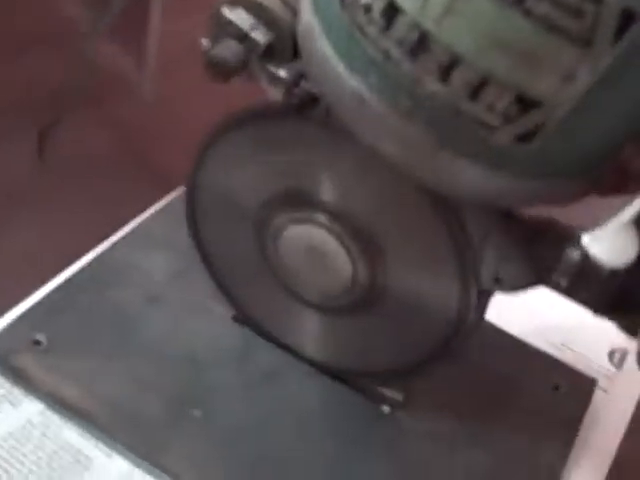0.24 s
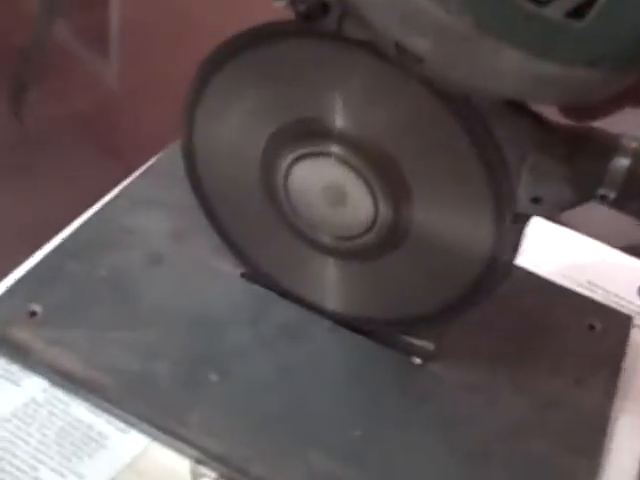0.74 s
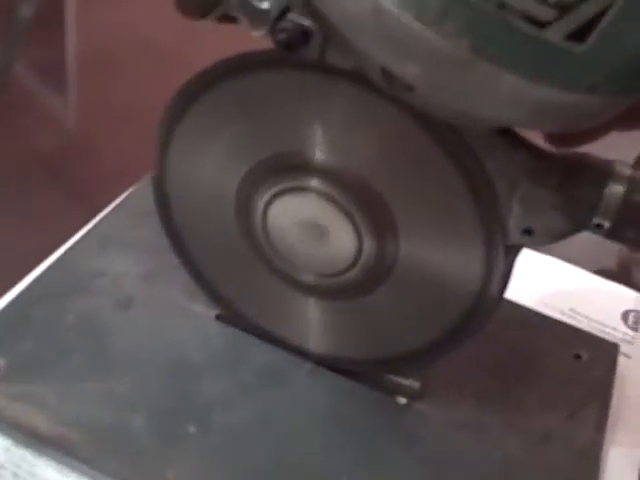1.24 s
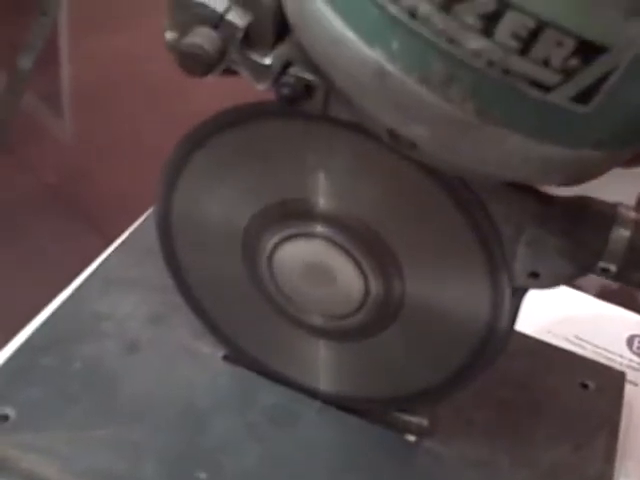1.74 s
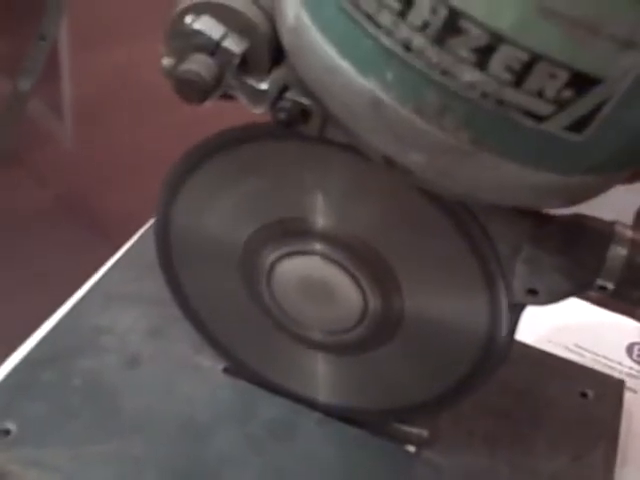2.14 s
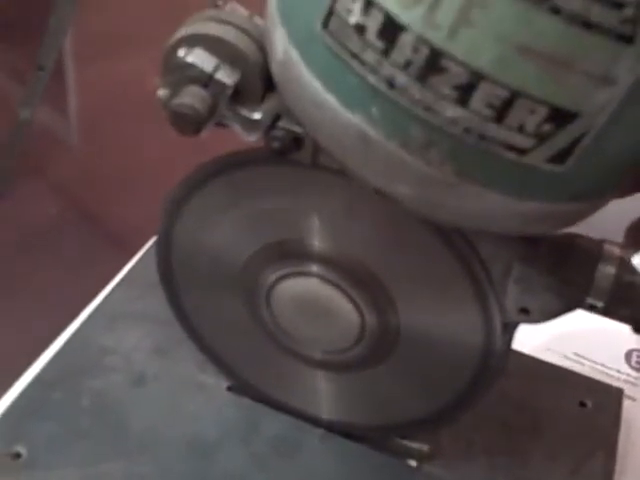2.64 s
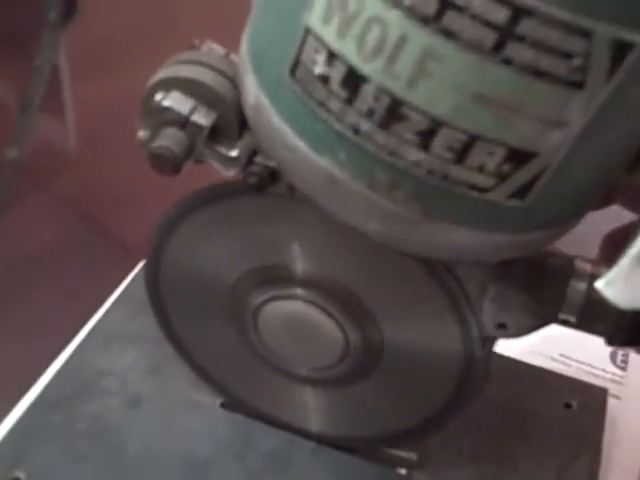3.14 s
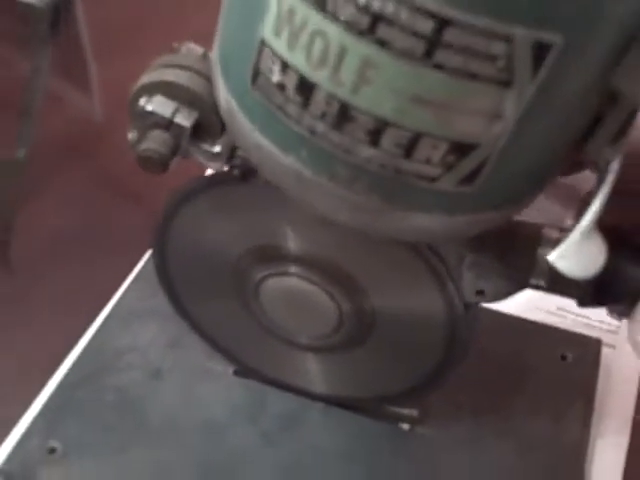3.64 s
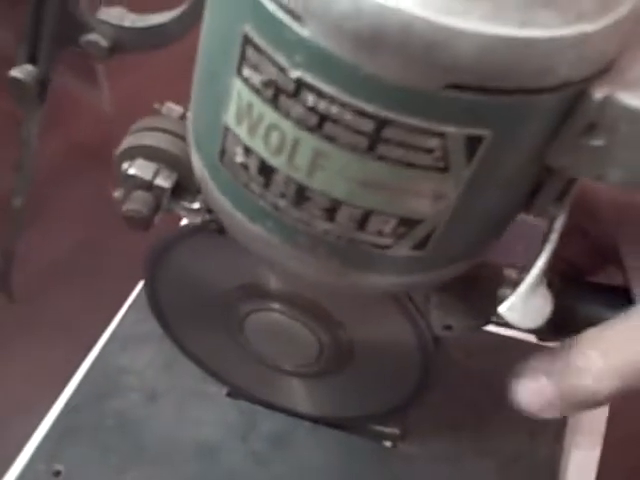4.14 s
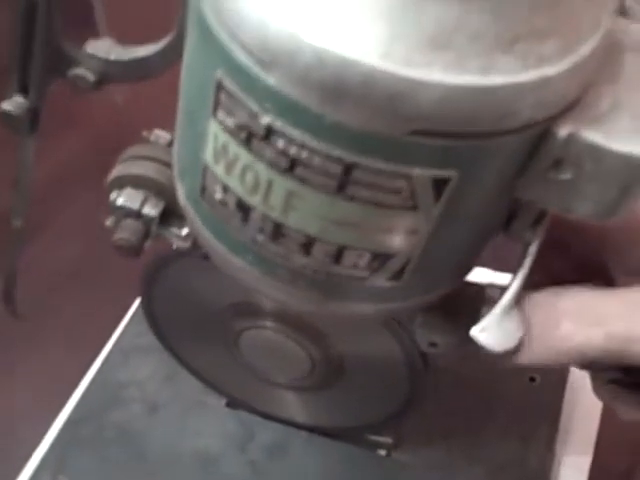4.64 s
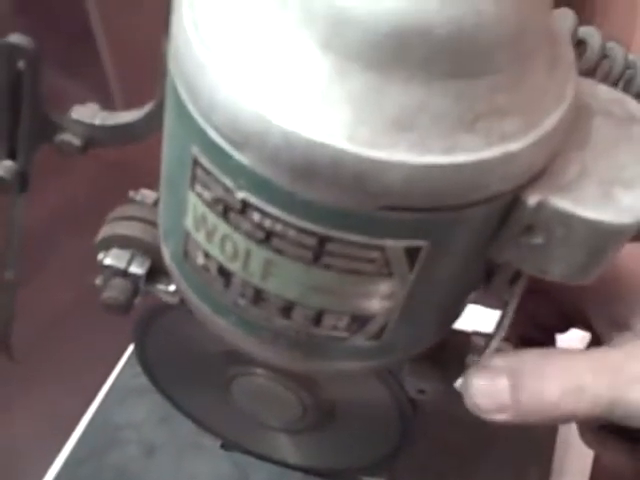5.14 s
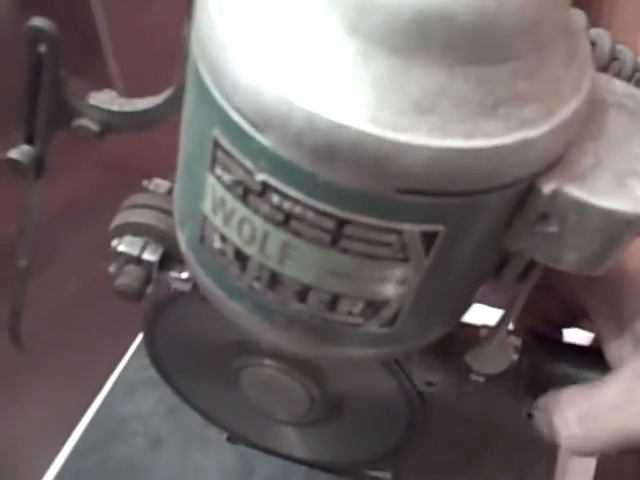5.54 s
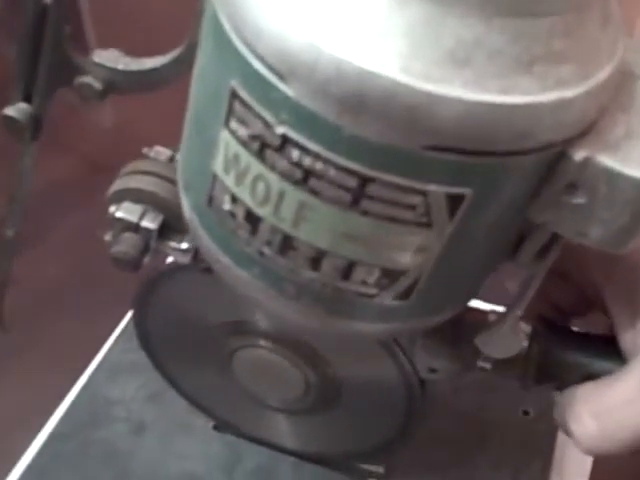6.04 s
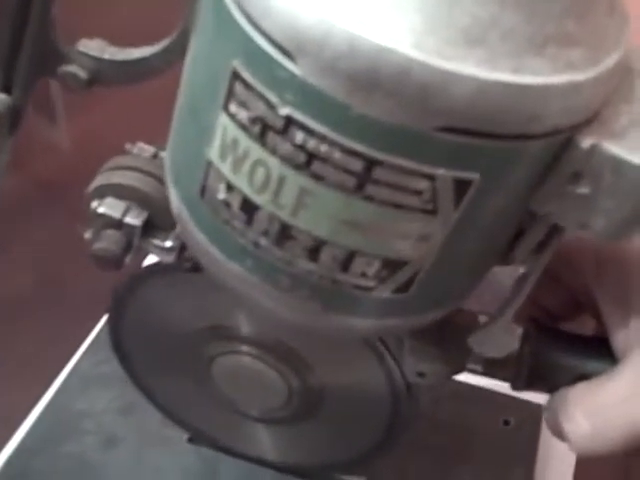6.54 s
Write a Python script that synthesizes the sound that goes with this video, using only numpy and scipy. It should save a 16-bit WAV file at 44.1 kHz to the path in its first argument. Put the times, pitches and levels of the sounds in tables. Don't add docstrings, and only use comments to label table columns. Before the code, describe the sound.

An electric cutter is already running at full speed, heard very close in a room with a faint low background hum. A buzzing geared drone holds steady, with a clear tone near 715 Hz, a stack of metallic whines above it and a broad airy hiss from the vents. High ringing tones from the blade flare and sink. Tiny bright steel ticks gather into a rattle around 0.6-1.3 s, again around 1.9-2.7 s, then more sparsely near 3.6-4 s and 5-5.4 s. As the microphone swings from blade to motor by about 5.2 s, the clear tone grows stronger and the grinding slightly softer. At 5.45 s a hard, bright switch snap bounces briefly. The pitch slides down, tones becoming ragged, surging and fading, hiss dwindling. From 6.54 s a dry, pulsing scrape with small catches rubs until the end at about 6.8 s, the rotor still turning.

```python
import sys
import numpy as np
from scipy import signal
from scipy.fft import rfft, irfft, next_fast_len
from scipy.io import wavfile
from scipy.ndimage import uniform_filter1d, map_coordinates

SR = 44100
rng = np.random.default_rng(int(sys.argv[2]) if len(sys.argv) > 2 else 0)


def bounce(signal):
    frames = np.transpose(np.atleast_2d(signal))
    limited = np.clip(frames, -1, 1)
    pcm = np.round(limited * 32767).astype(np.int16)
    wavfile.write(sys.argv[1], SR, pcm)


def gain_from_decibels(decibels):
    exponent = np.asarray(decibels, float) / 20
    return 10 ** exponent


N = 299870
T = np.arange(N) / SR

SHAFT_HZ, BLADE_HZ, BEAT_HZ = 59.652, 18.17, .685
BEAT_TOP_S = 0.937
OFF_S, BRAKE_PER_S, EASE_PER_S2 = 5.45, .51, .06
# t/s, share
VIEW = [(0, 0.62), (.4, 0.33), (1.0, 0.02), (1.8, 0.13), (2.8, 0.29), (3.5, 0.35), (3.68, 0.34),
        (3.84, 0.66), (4.3, 0.78), (4.6, .85), (5.19, 1), (5.45, 0.99), (5.7, 0.79), (6.8, 0.9)]
GEARS_LAW, CASING_LAW, AIR_LAW = (-29, -2.52, 0.76), (-27.5, -3, 1.723), (-35, -0.47, 1.81)

# f/Hz, level/dB per Hz
ROOM_TONE = [(13, -48), (22, -20.5), (54, -1.5), (97, -14), (306, -11.5), (367, -29.5), (400, -17.5),
             (520, -43.5), (880, -120)]
BUMP_S, BUMP_DB, BUMP_LASTS_S = 5.85, 6, .15

# shaft order, level/dB one blade turn below, on the order, one above, two above
GEARS = [(3, -53.8, -45.0, -44.3, -44.7), (4, -46.0, -45.4, -34.9, -37.3), (5, -43.2, -44.7, -40.6, -45.0),
         (6, -46.5, -40.8, -49.1, -51.0), (7, -53.1, -46.5, -56.3, -50.4), (8, -52.3, -44.3, -53.0, -51.9),
         (9, -90.0, -50.4, -51.0, -50.0), (10, -50.6, -41.7, -45.3, -46.3),
         (11, -49.4, -38.8, -53.0, -55.3), (12, -90.0, -26.0, -71.8, -75.0),
         (13, -54.7, -58.6, -56.2, -90.0), (14, -57.4, -48.5, -63.1, -67.8),
         (15, -69.9, -53.3, -60.0, -69.1), (16, -67.8, -57.6, -59.3, -66.0),
         (17, -48.8, -39.0, -49.2, -57.9), (18, -49.1, -45.3, -43.5, -54.0),
         (19, -48.9, -43.1, -48.4, -79.5), (20, -54.3, -50.1, -55.5, -63.0),
         (21, -56.9, -46.9, -54.8, -59.9), (22, -64.2, -53.2, -60.7, -59.1),
         (23, -56.7, -51.3, -56.6, -60.6), (24, -54.4, -53.6, -62.6, -57.2),
         (25, -64.3, -48.2, -62.4, -90.0), (26, -65.2, -55.7, -65.5, -70.0)]
SWELL_DB, SWELL_LOW_DB, SWELL_LAG = 1.9, 2.5, 0.125
PINION, PINION_SWELL_DB, PINION_LAG, PINION_VIEW_DB = 17, 3, -.15, -4
LOW_VIEW_DB, MID_VIEW_DB = 2.5, -2
# t/s, level/dB
SURGES = [
    (5.71, 5),
    (5.83, 3),
    (5.97, 4),
    (6.15, 4),
    (6.24, 3),
    (6.37, 3),
    (6.51, 4),
]
SURGE_S = .035
# multiple of shaft speed, level/dB
BEARINGS = [(12.838, -51), (20.269, -49.5), (32.162, -56.5), (34.001, -46.5), (34.768, -49),
            (35.695, -49.5), (35.999, -49), (36.304, -53), (36.998, -50.5), (37.523, -48), (39.0, -49),
            (39.86, -53), (42.884, -46.5), (42.999, -46), (44.335, -51), (47.244, -54.5), (47.839, -45.5),
            (48.647, -47.5), (51.945, -51.5), (52.605, -53), (54.999, -46.5), (59.99, -51.0), (63.327, -52),
            (65.834, -52), (79.447, -56)]
# multiple of shaft speed, level/dB
TEETH = [(10.325, -45.5), (10.719, -51), (10.92, -51.5), (24.448, -52), (35.303, -57), (36.521, -66),
         (36.693, -57), (41.885, -60), (47.001, -54.5), (49.243, -58), (53.194, -60.5), (54.601, -44),
         (55.379, -48.5), (55.608, -49), (55.771, -48), (56.014, -53.5), (57.966, -56), (58.561, -49),
         (58.967, -55), (59.37, -63), (65.326, -73), (65.837, -69.5), (81.407, -50), (82.191, -54.5),
         (104.868, -54)]
# multiple of shaft speed, level/dB
TEETH_LOW = [(3.654, -50.5), (4.655, -41), (5.324, -42.5)]
# multiple of shaft speed, level/dB
FAINT = [(8.93, -46), (20.53, -56), (33.3, -56), (33.71, -55), (34.29, -55), (37.99, -55), (40.88, -54),
         (41.65, -56), (44.72, -56), (45.08, -55), (46.43, -53), (48.24, -47), (49.91, -55), (51.21, -52),
         (51.62, -53), (56.72, -54), (56.99, -56), (59.38, -55), (70.08, -60), (72.6, -60), (73.46, -59),
         (76.03, -55), (77.75, -58), (80.45, -56), (82.21, -54), (82.89, -57), (84.74, -60), (85.64, -60),
         (86.36, -61), (86.77, -60), (89.07, -61), (90.74, -60), (92.73, -61), (95.21, -61), (120.21, -60)]
FAINT_DB = 3
# multiples of shaft speed; dB facing the blade, change at the motor
SHADED, SHADE_DB = (42.884, 42.999), (4, -15)
# f/Hz, width/Hz, level/dB
BODY = [(195.2, 67, -6.5), (265, 37, -0.5), (313.3, 20.5, 3.5), (436, 91, -24), (644.5, 152.2, -0.5),
        (834, 30.5, -9), (1072, 100, -10), (1347, 194, -10.5), (1720, 200, -31.5), (2043, 560, -14),
        (2568, 112, -12), (2932, 127, -7.5), (3290, 320, -9.5), (3750, 270, -34.5), (4720, 380, -20.5),
        (5786, 310, -18.5)]
HOOD, HOOD_SHARE = (3050, 700, 0), .45
# f/Hz, width/Hz, grinding level/dB in the drive
DISC_MODES = [(2150, 140, -9), (3185, 130, -10), (4725, 240, -6)]
# t/s, peak level/dB, t/s to lose 10 dB
FLARES = [
    [(.44, -39, 0.21), (1.3, -31.5, .25), (1.75, -31.5, .35), (2.3, -40, 0.34), (2.7, -35, 0.27),
     (3.38, -34.5, 0.26), (4.09, -45.5, 0.2), (5.4, -51.5, 0.24), (6.55, -46, 0.07)],
    [(.1, -28.5, .35), (.95, -37, .3), (2.27, -41, 0.07), (2.92, -30.5, 0.18), (3.7, -37, 0.16),
     (4.1, -26.5, .28), (4.6, -36.5, 0.2), (5.06, -34.5, 0.31), (5.7, -34, .3), (6.29, -41.5, 0.17),
     (6.8, -38, 0.1)],
    [(.5, -32.5, .1), (1.5, -45, 0.15), (2.27, -41, 0.09), (2.95, -33, .25), (3.42, -29.5, .3),
     (3.82, -31, .28), (4.53, -35, 0.39), (5.06, -33.5, .45), (5.5, -36, 0.25), (5.72, -38, .3),
     (5.95, -40, .3), (6.29, -45, 0.32)],
]
REST_DB = [-56, -56.5, -58.5]
# f/Hz, level/dB per Hz
AIR = [(1500, -16), (2500, -3), (3880, -7), (4020, -11), (4600, -11), (5400, -8.5), (6600, -14.5),
       (7600, -15.5), (8300, -16), (9300, -14), (10200, -11.5), (11500, -16), (13300, -15.5), (14100, -18),
       (15200, -22.5), (15800, -14)]
# f/Hz, width/Hz, level/dB over the air
VENTS = [(6225, 50, 3), (7075, 130, 8.5), (7688, 230, 6.5), (11530, 194, 2), (12900, 300, 1.5),
         (15300, 400, -3.5)]
START_DB, START_S = 3, .1
MESH_DB, MESH_VIEW_DB = -28.5, 7

SINGERS = [53.326, 78.735, 79.466]
# t/s, peak level/dB
SONGS = [
    [(.2, -34), (.45, -37), (.85, -36), (1.3, -40), (1.7, -40), (2.2, -39), (2.95, -35), (3.5, -37),
     (4.1, -30), (4.45, -35), (4.75, -38), (5.1, -42)],
    [(.1, -46), (.95, -44), (1.55, -42), (1.8, -43), (2.1, -46), (2.6, -49), (3.13, -39), (3.5, -37),
     (3.95, -39), (4.4, -38), (4.65, -41), (5.1, -39)],
    [(.5, -40), (.75, -45), (1.2, -49), (2.2, -48), (2.6, -46), (2.95, -37), (3.3, -36), (3.45, -34),
     (3.75, -36), (4.2, -44), (4.5, -41), (4.75, -40), (5.2, -47)],
]
SONG_FADE_DB_PER_S = 55

# t/s, peak level/dB, brightness/dB
TICKS_FIRST = [(0.0962, -33, -15), (0.1006, -35, -10), (0.1083, -35, -14), (0.1124, -36, -13),
               (0.1178, -36, -14), (0.429, -29, -9), (0.529, -35, -14), (0.5409, -30, -18),
               (0.5454, -33, -12), (0.5958, -32, -13), (0.6072, -32, -15), (0.6462, -35, -15),
               (0.6574, -24, -18), (0.6732, -30, -19), (0.7078, -29, -17), (0.7236, -29, -19),
               (0.7579, -29, -20), (0.7636, -28, -20), (0.8077, -26, -14), (0.8136, -26, -12),
               (0.8198, -29, -19), (0.8245, -20, -17), (0.8636, -23, -11), (0.8695, -31, -18),
               (0.8748, -21, -20), (0.8859, -32, -17), (0.9249, -20, -14), (0.9366, -29, -11),
               (0.9412, -21, -12), (0.9644, -33, -16), (0.9752, -24, -19), (0.9809, -19, -9),
               (0.9866, -26, -9), (0.9917, -17, -12), (1.0251, -26, -22), (1.0372, -31, -15),
               (1.042, -18, -8), (1.0812, -32, -6), (1.0864, -31, -13), (1.0923, -20, -12),
               (1.1034, -30, -10), (1.1425, -28, -11), (1.1483, -23, -8), (1.159, -23, -13),
               (1.1984, -24, -13), (1.2094, -27, -21), (1.2427, -34, -16), (1.2487, -30, -19),
               (1.2599, -30, -11), (1.3043, -32, -6), (1.3101, -31, -17), (1.3156, -23, -11),
               (1.3771, -33, -17), (1.432, -30, -18), (1.4827, -31, -18), (1.5331, -35, -15),
               (1.6478, -35, -15)]
# t/s, peak level/dB, brightness/dB
TICKS_SECOND = [(1.8155, -33, -14), (1.8485, -33, -16), (1.8659, -29, -19), (1.9162, -27, -21),
                (1.9205, -35, -15), (1.9659, -33, -16), (1.9704, -26, -22), (2.0172, -32, -17),
                (2.0337, -33, -16), (2.0716, -31, -18), (2.076, -34, -15), (2.0828, -26, -21),
                (2.133, -25, -10), (2.1386, -30, -9), (2.1827, -26, -12), (2.1883, -23, -10),
                (2.2001, -25, -16), (2.2328, -33, -14), (2.2383, -24, -16), (2.2441, -28, -20),
                (2.25, -28, -20), (2.2996, -24, -11), (2.3164, -27, -21), (2.3555, -22, -12),
                (2.3617, -32, -13), (2.3664, -23, -11), (2.3999, -24, -15), (2.4059, -22, -16),
                (2.4168, -16, -9), (2.456, -29, -8), (2.4609, -27, -8), (2.4668, -21, -13),
                (2.4778, -29, -9), (2.5173, -22, -5), (2.5235, -25, -11), (2.5295, -31, -8),
                (2.5337, -21, -13), (2.556, -27, -16), (2.5676, -29, -19), (2.5732, -27, -12),
                (2.5847, -23, -10), (2.6064, -33, -16), (2.6345, -21, -12), (2.6848, -27, -11),
                (2.7516, -34, -15), (2.7876, -34, -16), (2.908, -32, -17)]
# t/s, peak level/dB, brightness/dB
TICKS_LATE = [(3.2915, -33, -16), (3.5631, -27, -13), (3.6244, -29, -15), (3.6299, -32, -17),
              (3.6744, -32, -14), (3.7914, -29, -9), (3.8365, -34, -10), (3.8417, -24, -5),
              (3.8475, -32, -17), (3.892, -31, -7), (3.8986, -34, -16), (3.9093, -29, -9),
              (3.9432, -31, -9), (3.9478, -28, -6), (3.9534, -33, -8), (3.9598, -26, -9),
              (3.9931, -31, -15), (4.01, -32, -13), (4.0602, -32, -17), (4.2048, -35, -15),
              (4.274, -35, -15), (5.0001, -35, -15), (5.0199, -34, -15), (5.0501, -33, -16),
              (5.1003, -34, -16), (5.1561, -32, -17), (5.1667, -26, -21), (5.2169, -24, -10),
              (5.2287, -31, -18), (5.3173, -33, -16), (5.3235, -30, -18), (5.3284, -33, -16),
              (5.3337, -24, -15), (5.3671, -31, -14), (5.3841, -23, -7), (5.4113, -24, -1),
              (5.4343, -24, -20)]
# f/Hz, width/Hz, level/dB
RATTLE_MODES = [(9070, 380, 3), (10250, 480, -5), (11500, 550, -7.5), (14050, 400, 4), (15400, 550, 6),
                (8100, 500, 0)]
REBOUND_S, REBOUND_DB = .00088, -5

# t/s, level/dB, length/s
SWITCH = [
    (5.4452, 0, 0.0043),
    (5.4465, -0.5, .003),
    (5.4480, -6, 0.0049),
    (5.454, -19.5, 0.0037),
    (5.4575, -21, .004),
    (5.4665, -27, .006),
    (5.4755, -28, .006),
    (5.4105, -24, .006),
]
# f/Hz, level/dB per Hz
SNAP = [(80, -22), (500, -11), (1200, -9), (2500, -5), (3600, -14), (4300, -4), (5200, -6), (6500, -3.5),
        (8000, -10), (9000, 3), (12000, -5), (14400, -1.5), (15800, -7.5)]

# multiple of shaft speed, level/dB, mode f/Hz
SWEEPS = [(60.1, -36, 3170), (63.55, -40, 3185), (80.6, -43, 3185), (54, -46, 2900), (12.9, -41, 655),
          (15.5, -40, 640), (18.2, -40.5, 645), (21.2, -43, 650), (6.1, -37.5, 320), (7.1, -41, 300),
          (8.2, -39, 325), (9.4, -42, 315), (10.2, -43, 305)]

DRAG_S, DRAG_DB, DRAG_ATTACK_S, DRAG_SAG_DB_PER_S = 6.544, -33.5, .005, 9
# t/s, peak level/dB
CATCH = [(6.548, -22), (6.5545, -28), (6.571, -26), (6.638, -27), (6.715, -24), (6.728, -28), (6.741, -29),
         (6.796, -27), (6.5845, -20), (6.6062, -23), (6.6198, -21), (6.664, -30), (6.6765, -29.5),
         (6.703, -24.5), (6.7538, -29.5), (6.7806, -27.5)]
# f/Hz, level/dB per Hz
RUB = [(1060, -27), (1800, -5), (2180, -18), (2470, -5.5), (2990, -1.5), (3330, 0), (4190, -28),
       (4720, -6.5), (5360, -19), (5970, -8), (7900, -24), (8910, -10), (11000, -17), (15800, -19)]


def unit(x):
    return x / np.sqrt(np.mean(x ** 2) + 1e-20)


def since(s):
    return np.clip(T - s, 0, None)


def hit(s, db, fall_db_per_s):
    return gain_from_decibels(db - fall_db_per_s * since(s)) * (T >= s)


def curves(rows):
    s, *cols = np.transpose(rows)
    return [np.interp(T, s, c) for c in cols]


def wobble(rate, through=lambda v: v):
    coarse = T[::128]
    knots = rng.standard_normal(int(N * rate / SR) + 4)
    return np.interp(T, coarse, through(map_coordinates(knots, [coarse * rate])))


def filtered(x, response):
    m = next_fast_len(N + SR // 2)
    return irfft(rfft(x, m) * response(np.fft.rfftfreq(m, 1 / SR)), m)[:N]


def colour(points):
    hz, db = np.transpose(points)
    return lambda f: gain_from_decibels(np.interp(np.log(f + 1), np.log(hz + 1), db))


def noise(response):
    return unit(filtered(rng.standard_normal(N), response))


def modes(rows):
    def response(f):
        return sum((-1) ** k * gain_from_decibels(db) * 1j * f * w / (c * c - f * f + 1j * f * w)
                   for k, (c, w, db) in enumerate(rows))
    return response


def mode_power(f, rows):
    return sum(np.abs(modes([row])(f)) ** 2 for row in rows)


def body(f):
    power = sum(gain_from_decibels(2 * db) / (1 + ((c * c - f * f) / (f * w + 1e-9)) ** 2) for c, w, db in BODY)
    return np.sqrt(power) / (1 + (130 / (f + 1)) ** 4) / (1 + (f / 7000) ** 6)


def sine(turns):
    return 2 ** .5 * np.sin(2 * np.pi * turns)


def tone(turns, db, steady_hz):
    return gain_from_decibels(db) * 2 ** .5 / body(steady_hz) * np.sin((2 * np.pi * (turns % 1)).astype(np.float32))


def speed():
    coast = since(OFF_S)
    return 1 - BRAKE_PER_S * coast + EASE_PER_S2 * coast ** 2


def level(facing_db, turned_db, power=0):
    return facing_db + turned_db * curves(VIEW)[0] + power * 20 * np.log10(speed())


def room():
    bump_db = BUMP_DB * np.exp(-((T - BUMP_S) / BUMP_LASTS_S) ** 2)
    hum = gain_from_decibels(-54.5 + 2 * wobble(6.4) + bump_db) * np.sin(2 * np.pi * 49.5 * T + 0.42 * wobble(7)) * 2 ** .5
    windings = gain_from_decibels(-53) * sine(120 * T) * (T < 5.447)
    return hum + windings + gain_from_decibels(-53.5) * noise(colour(ROOM_TONE))


def afloat():
    return np.minimum(9 * since(OFF_S), 1) * 3.8 * wobble(25)


def surges():
    return sum(db * np.exp(-((T - s) / SURGE_S) ** 2) for s, db in SURGES)


def gear_tones(shaft, blade, beat):
    low, middle, upper = np.zeros((3, N))
    view, = curves(VIEW)
    coast, surge_db = since(OFF_S), surges()
    for order, *levels in GEARS:
        depth_db = SWELL_DB + SWELL_LOW_DB / (order - 2) ** 2 if order < 12 else .6
        lag, turned_db, coast_db = SWELL_LAG, 0, 0
        if order < 7:
            turned_db = LOW_VIEW_DB
        elif 7 < order < 11:
            turned_db = MID_VIEW_DB
        elif order == PINION:
            depth_db, lag, turned_db = PINION_SWELL_DB, PINION_LAG, PINION_VIEW_DB
        if order < 8:
            coast_db = 1.5 * surge_db
        elif order < 14:
            coast_db = np.where(coast < .6, -8 * coast, 1.5 * surge_db + 1)
        swell_db = depth_db * np.cos(2 * np.pi * (beat - lag))
        sway = gain_from_decibels(.9 * wobble(2.9) + swell_db + turned_db * (view - .35) + coast_db)
        group = low if order < 14 else middle if order < 21 else upper
        start = rng.random()
        spread = .5 if order < 9 else 1
        for side, db in zip(range(-1, 3), levels):
            if (order, side) != (12, 0) and db > -58:
                turns = order * shaft + side * blade + start + spread * rng.random()
                group += sway * tone(turns, db, order * SHAFT_HZ + side * BLADE_HZ)
    low *= gain_from_decibels(-8 * coast - 4 * np.minimum(8 * coast, 1) + .6 * afloat())
    dip_db = -2.5 * np.sin(np.pi * np.minimum(coast / .45, 1))
    middle *= gain_from_decibels(-10 * coast + dip_db - 25 * np.clip(coast - .95, 0, None) + afloat())
    upper *= gain_from_decibels(-2 * np.minimum(5 * coast, 1) - 45 * np.clip(coast - .65, 0, None) + afloat())
    return low, middle, upper


def bearing_tones(shaft):
    view, = curves(VIEW)
    sound = np.zeros(N)
    for multiple, db in BEARINGS + TEETH + TEETH_LOW + [(m, db + FAINT_DB) for m, db in FAINT]:
        if multiple in SHADED:
            db = db + SHADE_DB[0] + SHADE_DB[1] * view
        turns = multiple * shaft + 0.0748 * wobble(6) + rng.random()
        sound += wobble(3.98, lambda v: gain_from_decibels(2.16 * v)) * tone(turns, db, multiple * SHAFT_HZ)
    return sound * gain_from_decibels(-22 * since(OFF_S) + afloat())


def worn(turns, size):
    return rng.standard_normal(size)[(turns % 1 * size).astype(int)]


def grinding(shaft, blade, beat):
    lash_db = 0.92 * np.cos(2 * np.pi * blade) + 0.89 * np.cos(2 * np.pi * shaft)
    lash_db += 0.68 * np.cos(2 * np.pi * (beat - SWELL_LAG)) + 5.91 * since(OFF_S)
    marks = 0.5 * worn(shaft, size=2048) + 0.363 * worn(blade, size=8192)
    return gain_from_decibels(lash_db) * (filtered(marks, lambda f: f > 1500) + 0.919 * rng.standard_normal(N))


def disc(drive, grind, blade):
    sound = np.zeros(N)
    for (hz, width, grind_db), flares, rest_db in zip(DISC_MODES, FLARES, REST_DB):
        flare_db = np.max([db - 10 * np.abs(T - s) / fade for s, db, fade in flares], axis=0)
        throb_db = 4 * (hz < 3000) * np.cos(2 * np.pi * blade)
        sing = gain_from_decibels(rest_db) + gain_from_decibels(flare_db + 1.1 * wobble(7) + throb_db)
        ring = filtered(drive + gain_from_decibels(grind_db) * grind, lambda f: modes([(hz, width, 0)])(f) ** 2)
        ring /= np.sqrt(uniform_filter1d(ring ** 2, size=SR // 6) + 1e-12)
        sound += gain_from_decibels(-5.5 - 4 * (hz > 3000) * (T < OFF_S)) * sing * ring
    return sound


def air(shaft):
    gusts = gain_from_decibels(0.66 * np.cos(6 * np.pi * shaft) + 0.67 * wobble(20))
    hiss = noise(lambda f: colour(AIR)(f) * np.sqrt(1 + mode_power(f, VENTS)))
    return gain_from_decibels(level(*AIR_LAW) + 1.5) * gusts * hiss


def motor(shaft, beat):
    blade = shaft * BLADE_HZ / SHAFT_HZ
    view, = curves(VIEW)
    low, middle, upper = gear_tones(shaft, blade, beat)
    high = bearing_tones(shaft) + middle + upper
    grind = grinding(shaft, blade, beat)

    def below(f):
        return 1 / (1 + (f / 900) ** 6)

    def beside_disc(f):
        return body(f) * (1 - 0.566 * mode_power(f, [(hz, w, 0) for hz, w, _ in DISC_MODES[1:]]))

    rumble = gain_from_decibels(-15 - 2.5 * since(OFF_S) + .8 * surges()) * filtered(grind, below)
    gears = gain_from_decibels(level(*GEARS_LAW) + 29.5) * (low + rumble)
    scrape = gain_from_decibels(-14) * filtered(grind, lambda f: 1 - below(f))
    casing = gain_from_decibels(level(*CASING_LAW) + 28) * (high + scrape)
    sound = gain_from_decibels(START_DB * np.exp(-(T / START_S) ** 2)) * filtered(gears + casing, beside_disc)
    hood = filtered(casing, lambda f: body(f) * mode_power(f, [HOOD]))
    sound += HOOD_SHARE * np.clip(view / .35 - 1, -1, .4) * hood
    return sound + disc(high, grind, blade) + air(shaft)


def mesh(shaft):
    fade_db = -23 * since(OFF_S) - 60 * since(5.92) - 60 * np.minimum(since(5.47), .07)
    fade_db += 1.5 * np.minimum(9 * since(OFF_S), 1) * wobble(22)
    return gain_from_decibels(level(MESH_DB, MESH_VIEW_DB) + fade_db + 0.43 * wobble(12)) * sine(12 * shaft)


def singers(shaft):
    sound = np.zeros(N)
    for multiple, song in zip(SINGERS, SONGS):
        db = np.max([top - SONG_FADE_DB_PER_S * np.abs(T - s) for s, top in song], axis=0) + 1.2 * wobble(12)
        sound += gain_from_decibels(db + 1) * sine(multiple * shaft + .06 * wobble(9))
    return sound


def rattle(beat):
    s, db, bright_db = np.transpose(TICKS_FIRST + TICKS_SECOND + TICKS_LATE)
    at = np.round(s * SR).astype(int)
    above = curves(VIEW)[0][at]
    count = len(RATTLE_MODES)
    sign = (-1) ** np.arange(count)
    ticks = np.zeros((count, N))
    strength = gain_from_decibels(db[:, None] + 1.5 * rng.standard_normal((len(s), count))) * sign
    bright_db = bright_db + 1.2 * above
    mode_db = [.3 * above, 3 * above, 4 * above, bright_db, bright_db, -16 + 11 * above]
    ticks[:, at] = strength.T * gain_from_decibels(mode_db)
    chatter = gain_from_decibels(-46.0 + 3.2 * np.cos(2 * np.pi * beat) + 3.5 * rng.standard_normal(N))
    chatter = chatter * (rng.random(N) < 150 / SR) * (T < OFF_S)
    ticks += chatter * gain_from_decibels([[-4], [0], [3], [-12], [-14], [-8]]) * sign[:, None]
    ticks = ticks + gain_from_decibels(REBOUND_DB) * np.roll(ticks, round(REBOUND_S * SR), axis=1)
    steel = modes([(11000, 8000, 0)])
    sound = np.zeros(N)
    for tick, ring in zip(ticks, RATTLE_MODES):
        sound += SR / (2 * np.pi * ring[1]) * filtered(tick, lambda f: modes([ring])(f) * steel(f) ** 2)
    return sound


def switch():
    shape = sum(hit(s, db - 2.5, 30 / life) for s, db, life in SWITCH)
    shape += hit(5.448, -28.5, 60 / .26)
    knock = hit(5.4455, -6, 60 / 0.0113) * rng.standard_normal(N)
    disc_ring = hit(5.4455, -30, 60 / .2) * np.sin(2 * np.pi * 4715 * T + 1.5 * wobble(90))
    return shape * noise(colour(SNAP)) + filtered(knock, body) + disc_ring


def sweeps(shaft):
    sound, off = np.zeros(N), T > OFF_S
    share = speed()[off]
    for multiple, db, mode_hz in SWEEPS:
        turns = multiple * shaft + .14 * wobble(30)
        mode = modes([(mode_hz, min(300, mode_hz / 3), 0)])
        near = np.abs(mode(multiple * SHAFT_HZ * share)) ** 4
        sound[off] += gain_from_decibels(db + 3.5 * wobble(30)[off]) * near * sine(turns[off])
    return sound


def drag(shaft):
    age = since(DRAG_S)
    pulse_db = 2.5 * np.cos(2 * np.pi * (3 * shaft - .07))
    rub = gain_from_decibels(DRAG_DB - DRAG_SAG_DB_PER_S * age + pulse_db + 1.46 * wobble(60))
    rub *= np.minimum(age / DRAG_ATTACK_S, 1)
    rub += sum(hit(s, db - 10.0, 60 / 0.015) for s, db in CATCH)
    return rub * noise(colour(RUB))


def scene():
    shaft = np.cumsum(SHAFT_HZ * speed()) / SR
    beat = BEAT_HZ * (np.minimum(T, OFF_S) - BEAT_TOP_S)
    running = room() + motor(shaft, beat) + mesh(shaft) + singers(shaft) + rattle(beat)
    stopping = switch() + sweeps(shaft) + drag(shaft)
    return (running + stopping)[None]


def top_cut(x):
    return signal.sosfilt(signal.butter(12, 15830, fs=SR, output="sos"), x)


def record(dry):
    band = filtered(dry[0], lambda hz: np.clip((15880 - hz) / 120, 0, 1))
    return top_cut(np.clip(band, -1, 1)[None])


dry = scene()
out = record(dry)
bounce(out)
```